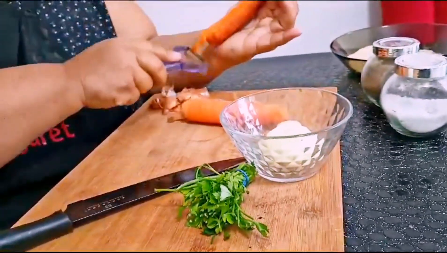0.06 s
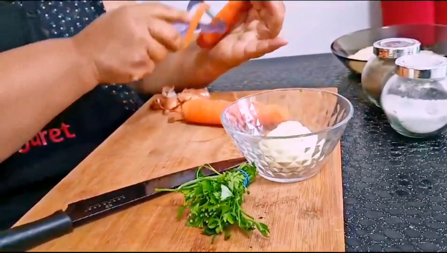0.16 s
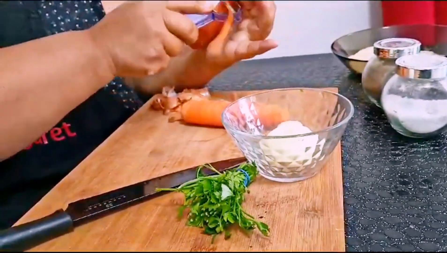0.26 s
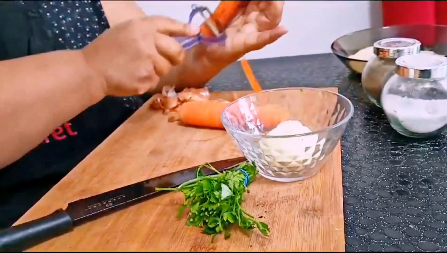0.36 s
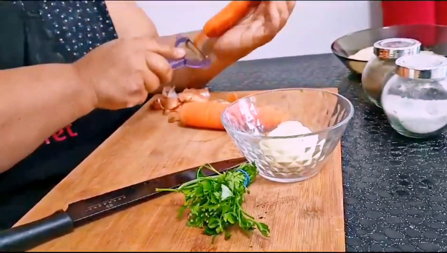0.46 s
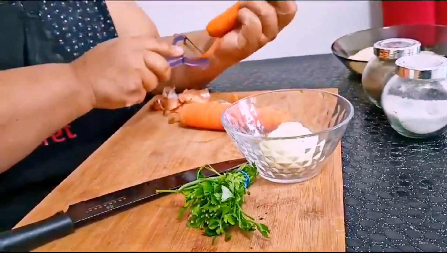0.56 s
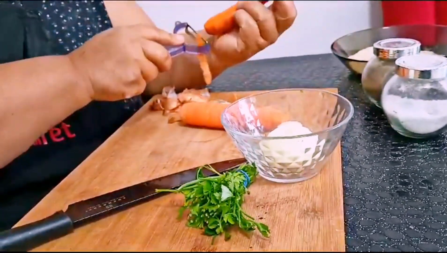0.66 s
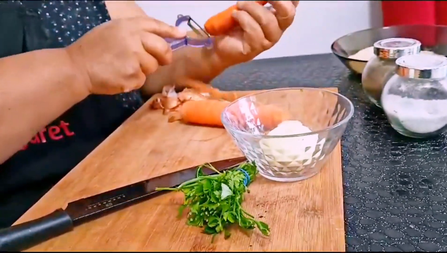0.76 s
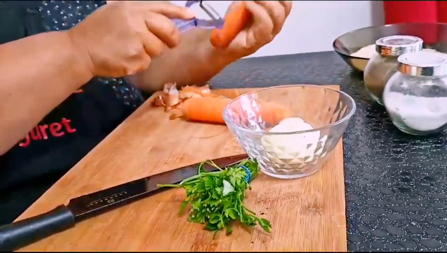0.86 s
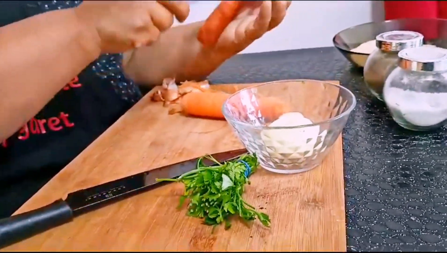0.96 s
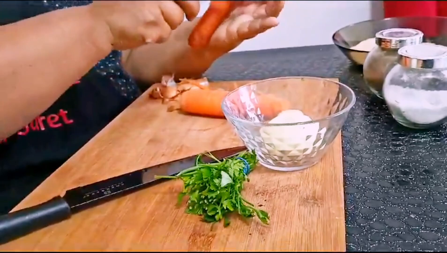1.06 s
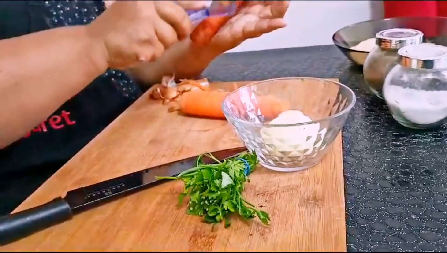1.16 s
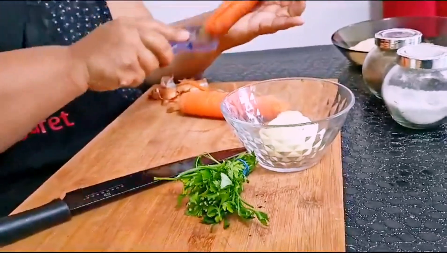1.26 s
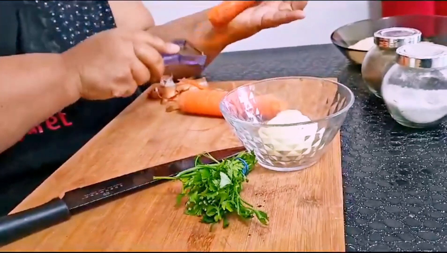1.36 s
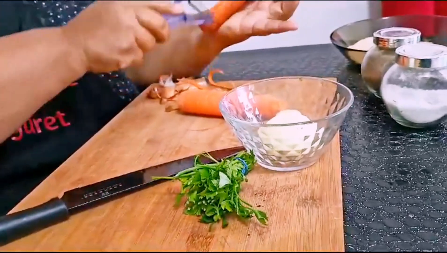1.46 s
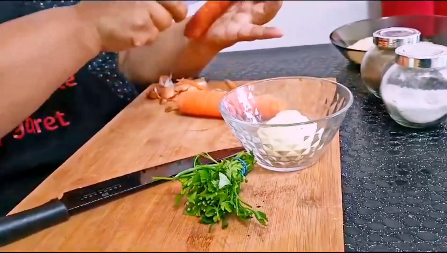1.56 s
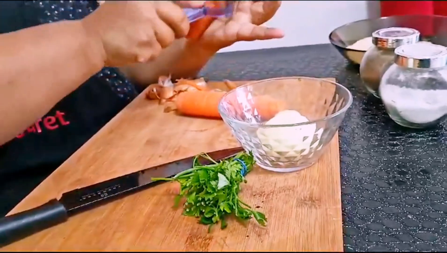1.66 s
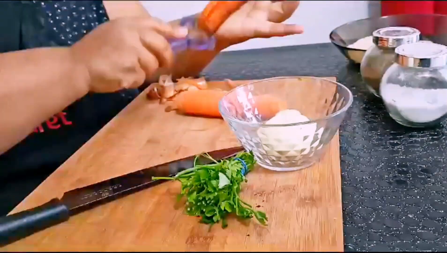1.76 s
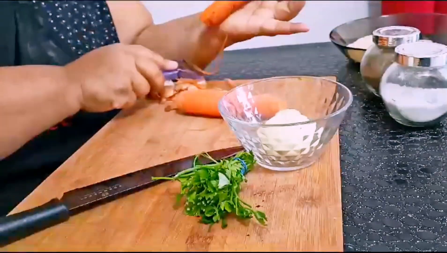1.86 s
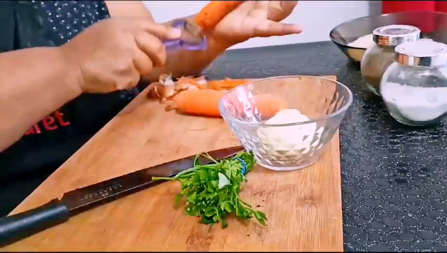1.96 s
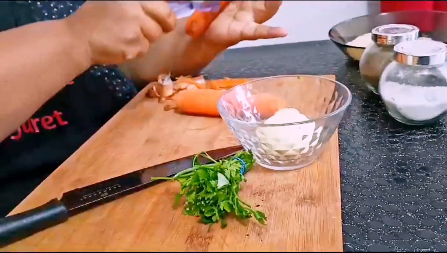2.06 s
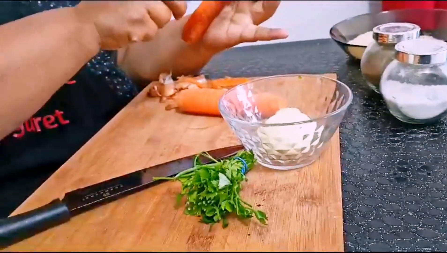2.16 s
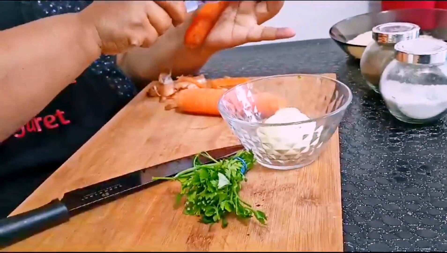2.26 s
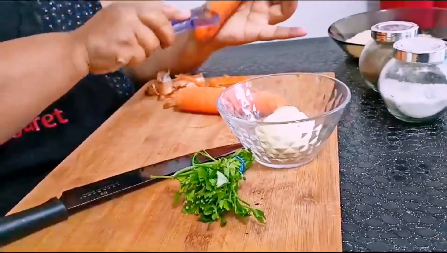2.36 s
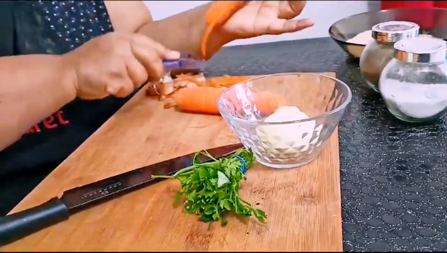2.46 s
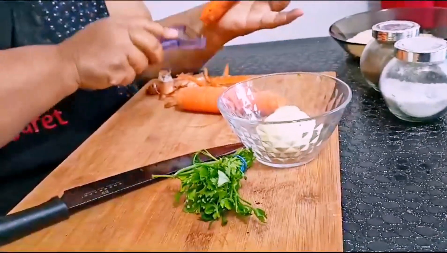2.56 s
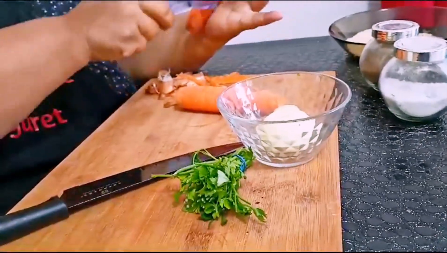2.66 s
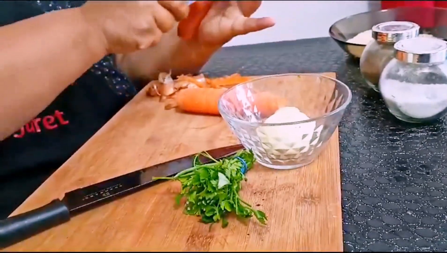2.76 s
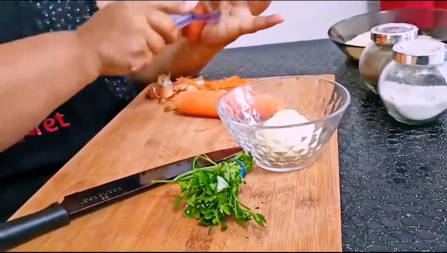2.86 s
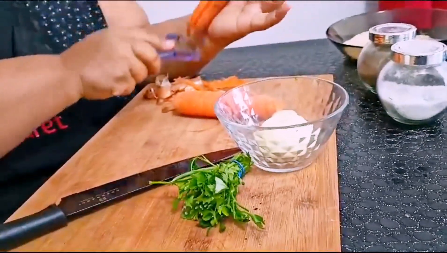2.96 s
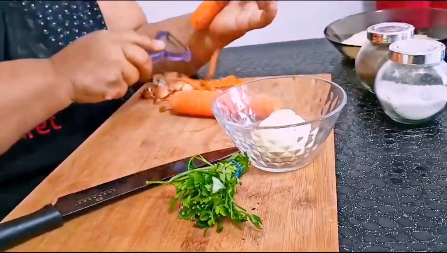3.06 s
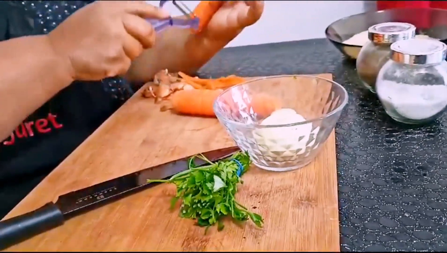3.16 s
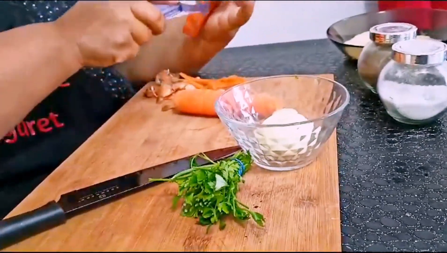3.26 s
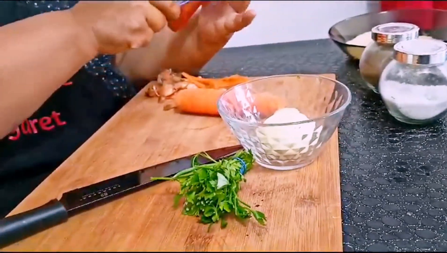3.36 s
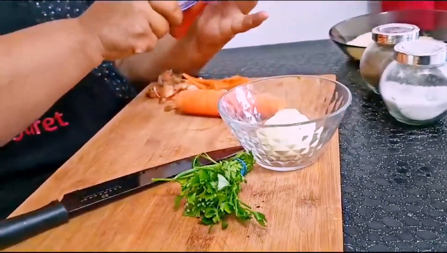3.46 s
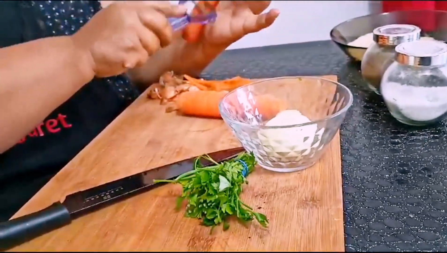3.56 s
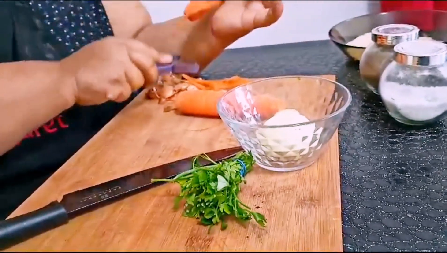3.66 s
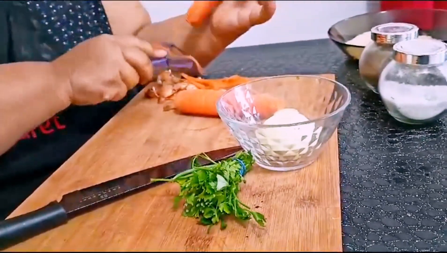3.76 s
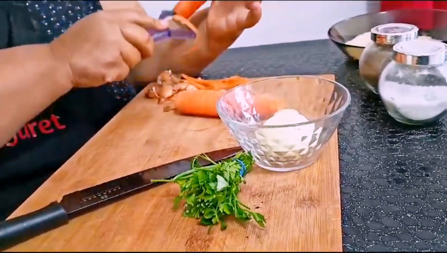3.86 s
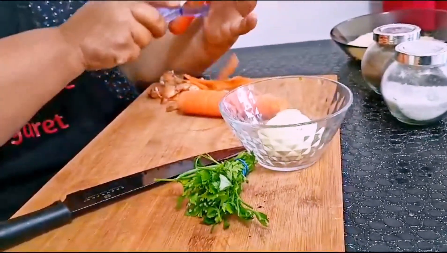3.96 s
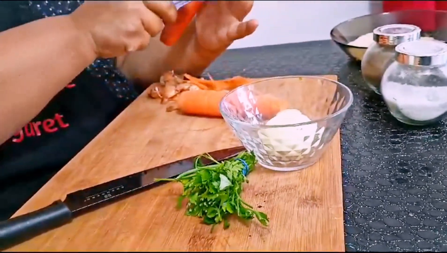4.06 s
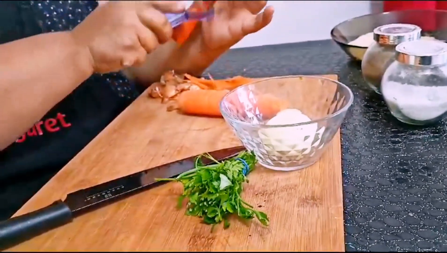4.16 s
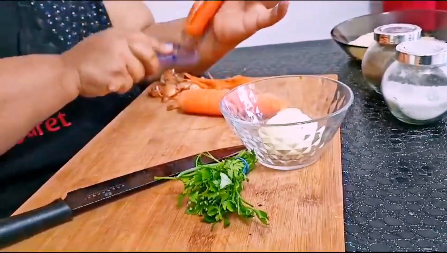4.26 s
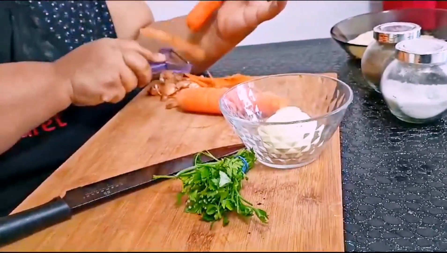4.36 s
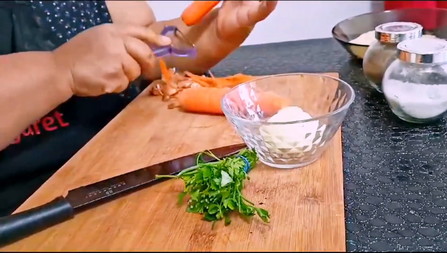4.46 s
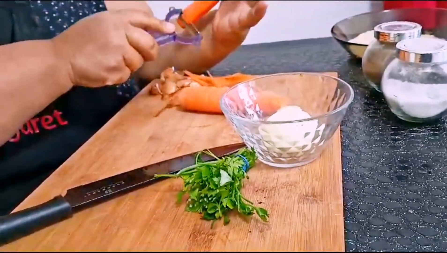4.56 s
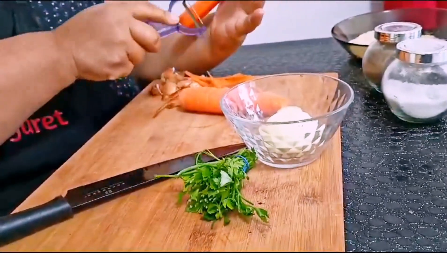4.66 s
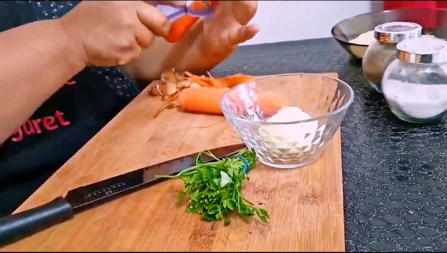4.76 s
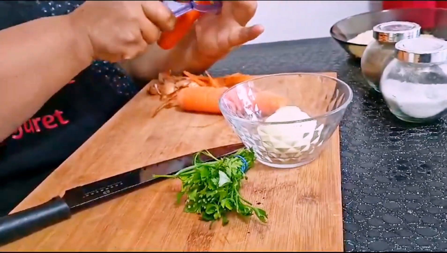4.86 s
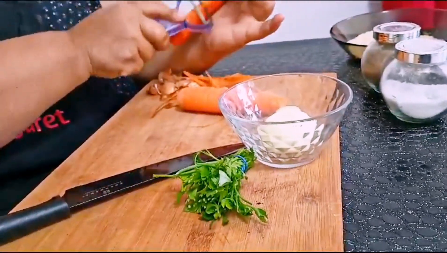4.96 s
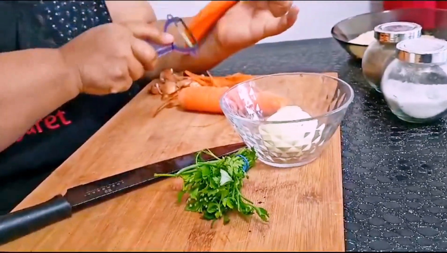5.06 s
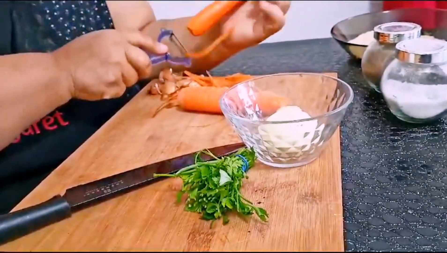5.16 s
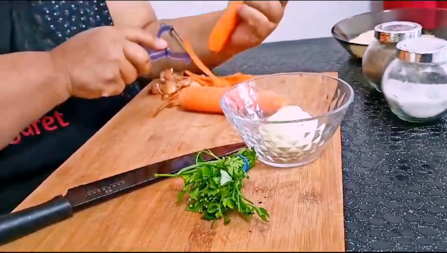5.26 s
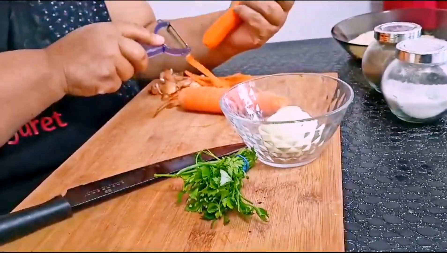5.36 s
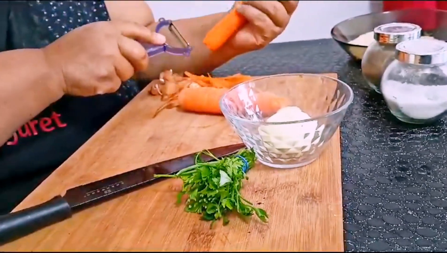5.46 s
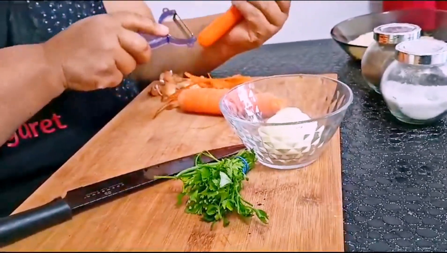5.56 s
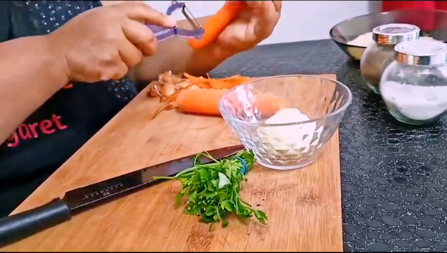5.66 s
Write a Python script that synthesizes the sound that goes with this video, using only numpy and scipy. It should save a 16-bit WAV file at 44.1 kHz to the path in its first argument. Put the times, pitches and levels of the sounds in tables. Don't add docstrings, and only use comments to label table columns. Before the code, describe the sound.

Crisp vegetable peeling, heard close: short gritty scrapes of roughly a fifth to a third of a second, most begun by a tick and all cut off by a hard metallic snap. Blade rattles, knocks and a damp slap of peel come between them. Hard kitchen surfaces give a short bright ring. Low hum and room air rise with the strokes and sink in the pauses, as a phone's noise gate does.

```python
import sys
import numpy as np
from scipy import signal
from scipy.fft import rfft, irfft
from scipy.io import wavfile
from scipy.ndimage import uniform_filter1d

SR = 44100
rng = np.random.default_rng(int(sys.argv[2]) if len(sys.argv) > 2 else 0)


def ratio_of_db(decibels):
    return 10 ** (np.asarray(decibels, float) / 20)


def file_out(sig):
    cols = np.atleast_2d(sig).T
    lim = np.clip(cols, -1, 1)
    pcm = np.round(lim * 32767).astype(np.int16)
    wavfile.write(sys.argv[1], SR, pcm)


N = 251487

# [t/s, peak level/dB, body re peak/dB, blade ring f/Hz, length/ms]
SNAPS = [
    (0.0225, -24.5, 0.5, 7140, 1.63),
    (0.4852, -22.5, 1.5, 7500, 3.9),
    (1.3219, -22.5, 0.5, 7200, 2.8),
    (1.8336, -18.5, -4, 9350, 2.85),
    (2.469, -22.5, -1, 7270, 4.5),
    (3.008, -21, -5.5, 7850, 3.9),
    (3.6969, -17, -7.5, 7700, 3.74),
    (4.3121, -21, -3, 7870, 2.75),
    (5.158, -21.5, -7.5, 7340, 2.8),
]


def evened(x):
    return x / np.sqrt(np.mean(x ** 2) + 1e-20)


def read(points, hz):
    f, value = np.transpose(points)
    return np.interp(np.log(hz + 1), np.log(f + 1), value)


def add(mix, s, sound):
    part = mix[max(round(s * SR), 0):][:len(sound)]
    part += sound[:len(part)]


def wander(seconds):
    size = max(round(seconds * SR), 2)
    return evened(uniform_filter1d(uniform_filter1d(rng.standard_normal(N), size), size))


def resonate(x, hz, width):
    turn = np.exp(2j * np.pi * np.cumsum(hz * np.ones(len(x))) / SR)
    r = np.exp(-np.pi * width / SR)
    return 2 * (turn * signal.lfilter([1 - r], [1, -r], x / turn + 1e-18)).real


def resonate_twice(x, hz, width):
    return resonate(resonate(x, hz, width), hz, width)


def colour(x, points):
    hz = abs(np.fft.fftfreq(4096, 1 / SR))
    log_gain = np.log(ratio_of_db(np.maximum(read(points, hz), -100)))
    response = np.fft.ifft(np.exp(np.conj(signal.hilbert(log_gain)))).real[:2048]
    return signal.oaconvolve(x, response)[:len(x)]


def gate_db():
    # [starts to open t/s, opening length/s, shuts t/s, open hum level/dB, shut hum level/dB]
    openings = [(-0.1, 0.05, 0.078, -53.5, -60), (0.23, 0.12, 0.58, -52.5, -62),
                (0.633, 0.019, 0.685, -58.5, -64.5), (1.067, 0.1, 1.42, -54, -62),
                (1.613, 0.096, 1.928, -54, -62.5), (2.05, 0.032, 2.04, -60, -66.5),
                (2.319, 0.11, 2.54, -52.5, -64.5), (2.75, 0.097, 3.15, -55, -65.5),
                (3.41, 0.07, 3.47, -55, -58), (3.555, 0.054, 3.8, -54.5, -66),
                (4.124, 0.13, 4.4, -52.5, -58), (4.603, 0.054, 4.85, -58.5, -62),
                (4.857, 0.16, 5.25, -52.5, -66)]
    shut_db_per_s, sink_db_per_s, flutter_db = 118, -2.5, 0.97
    opens, rise, shuts, open_db, rest_db = np.transpose(openings)
    after = np.append(opens[1:], N / SR)
    shut = shuts + abs(open_db - rest_db) / shut_db_per_s
    s = np.ravel([opens + rise, shuts, shut, after], "F")
    db = np.ravel([open_db, open_db, rest_db, rest_db + sink_db_per_s * (after - shut)], "F")
    return np.interp(np.arange(N) / SR, np.maximum.accumulate(s), db) + flutter_db * wander(0.027)


def background(open_db):
    # [multiple of the hum/1, level/dB]
    harmonics = [(1, -32), (2, -7), (3, -1.95), (4, -18.5), (5, -23.5), (6, -22)]
    # [f/Hz, level/dB]
    air_spectrum = [(15, -59), (25, -30), (65, -13), (111, -10), (220, -10), (296, -9), (1010, -22.5),
                    (1780, -21), (2270, -26), (2820, -24.5), (5720, -34), (7510, -34.5), (10400, -44),
                    (15200, -32.5), (16500, -29)]
    # [f/Hz, width/Hz, level re air/dB]
    air_peaks = [(2780, 254, -43), (7930, 1100, -14)]
    hum_hz, air_db = 71.64, -5
    fan = (1800, 110, -15.5)  # f/Hz, width/Hz, level re air/dB
    t = np.arange(N) / SR
    hum = np.sqrt(2) * sum(ratio_of_db(db) * np.cos(2 * np.pi * k * hum_hz * t) for k, db in harmonics)
    noise = rng.standard_normal(N)
    air = evened(irfft(rfft(noise) * ratio_of_db(read(air_spectrum, np.fft.rfftfreq(N, 1 / SR))), N))
    for hz, width, db in list(air_peaks) + [fan]:
        air = air + ratio_of_db(db) * evened(resonate(noise[::-1], hz, width))
    return ratio_of_db(uniform_filter1d(open_db, 900)) * (hum + ratio_of_db(air_db) * air)


def tail():
    # [f/Hz, t60/s]
    decay = [(500, 0.42), (2000, 0.43), (5000, 0.34), (8000, 0.34), (12000, 0.18), (16000, 0.33)]
    # [delay t/s, level/dB]
    echoes = [(.0031, -7.5), (.0085, -11), (0.0171, -28)]
    taps = np.zeros(SR // 2)
    at = np.arange(260, SR // 2 - 12, 12)
    taps[at + rng.integers(0, 12, len(at))] = rng.choice([-1., 1.], len(at))
    hz, t, z = signal.stft(taps, SR, nperseg=256)
    out = signal.istft(z * ratio_of_db(-60 * t / read(decay, hz)[:, None]), SR, nperseg=256)[1]
    out = out / np.linalg.norm(out)
    for s, db in echoes:
        add(out, s, ratio_of_db(np.array([db])))
    return out


def kitchen(x):
    turn = 2 * np.pi * 31 * np.arange(N) / SR
    shares = [np.sqrt(2 / 3) * np.cos(turn + k * np.pi / 3) for k in range(3)]
    return sum(signal.fftconvolve(x * share, tail())[:N] for share in shares)


def pats():
    # [t/s, peak level/dB, ring f/Hz]
    landings = [
        (0.687, -61, 573),
        (1.479, -49, 778),
        (3.092, -34, 1430),
        (3.431, -52, 1810),
        (4.389, -50, 1530),
    ]
    out, t = np.zeros(N), np.arange(600) / SR
    for (s, db, hz), noise in zip(landings, rng.standard_normal((len(landings), len(t)))):
        slap = resonate_twice(noise * np.exp(-t / 0.00038), hz, 1100)
        add(out, s, ratio_of_db(db) * slap / abs(slap).max())
    return out


def tearing():
    grains_per_s, spread_db = 9000, 2.5
    size = ratio_of_db(spread_db * np.minimum(rng.exponential(1, N), 5)) * rng.choice([-1., 1.], N)
    clumps = ratio_of_db(1.5 * evened(uniform_filter1d(rng.standard_normal(N), 130)))
    return evened(size * clumps * (rng.random(N) < grains_per_s / SR))


def flexes():
    # [t/s, length/s, level/dB, f/Hz]
    groans = [
        (5.03, 0.098, -59, 814),
        (2.96, .06, -60.5, 870),
    ]
    t, drive, out = np.arange(N) / SR, tearing(), 0
    for s, length, db, hz in groans:
        groan = evened(resonate_twice(drive, hz, 260))
        out = out + ratio_of_db(db) * groan * np.sin(np.pi * np.clip((t - s) / length, 0, 1))
    return out


def knocks():
    # [t/s, peak level/dB, low ring f/Hz, upper ring f/Hz, upper re low/dB]
    blows = [(0.0225, -37.5, 1410, 3070, 8), (0.2698, -27, 2070, 3480, 0), (0.4853, -27.5, 2500, 3120, 2),
             (1.1076, -38.5, 2460, 3230, -8), (1.3229, -32.5, 1760, 2830, -0.5),
             (1.4807, -51, 2570, 2930, -9), (1.6462, -32.5, 2430, 3230, -1.5),
             (1.8332, -27, 1700, 3160, -3), (2.4695, -41, 2680, 3500, -12), (2.7846, -33, 2060, 4520, -6),
             (3.0068, -26.5, 2600, 2845, -14), (3.4326, -45, 1800, 3800, 2.5),
             (3.697, -32, 1830, 2750, 0.5), (4.312, -43, 2500, 2820, -2), (4.8693, -37, 2059, 3130, -9),
             (5.1575, -32.5, 1360, 3230, -2)]
    out, t = np.zeros(N), np.arange(1500) / SR
    for s, db, low_hz, upper_hz, upper_db in blows:
        # f/Hz, level re low ring/dB, t60/s; the last is the blade
        rings = [(low_hz, 0, 0.01), (upper_hz, upper_db, 0.019), (4865, -4, 0.018)]
        sound = sum(ratio_of_db(d - 60 * t / t60) * np.sin(2 * np.pi * hz * t) for hz, d, t60 in rings)
        add(out, s, ratio_of_db(db + 2) * sound * (1 - np.exp(-t / 0.00097)))
    return out


def peeler(x, damp_db=0):
    # [f/Hz, level/dB]
    rasp_spectrum = [(290, -25.5), (500, -9), (700, -14.5), (764, -17), (1220, -9), (1730, -8),
                     (2260, -4.5), (3020, -5.5), (3400, -6.5), (5930, -20.5), (7490, -7), (9600, -13.5),
                     (15100, 4), (15800, 1), (16500, -15.5)]
    # [f/Hz, width/Hz, level/dB]
    blade_modes = [(1760, 130, 1.5), (3080, 170, 4), (5080, 170, 4), (7400, 350, 0.5), (10200, 200, -3)]
    blade = sum(ratio_of_db(db + damp_db) * resonate(x, hz, width) for hz, width, db in blade_modes)
    y = colour(x + blade, rasp_spectrum)
    body = signal.sosfilt(signal.butter(4, 4500, fs=SR, output="sos"), y)
    edge = signal.sosfilt(signal.butter(4, [4500, 11000], "band", fs=SR, output="sos"), y)
    fizz = signal.sosfilt(signal.butter(6, 11000, "high", fs=SR, output="sos"), y)
    return evened(body), evened(edge), evened(fizz)


def rubs():
    # [t/s, peak level/dB, fade/(dB/s), body re level/dB, fizz re level/dB]
    slides = [
        (0.193, -65, -400, 4, -9),
        (0.831, -64.5, -300, -5, -6),
        (0.90, -73.5, -200, -11, 3),
        (1.485, -62.5, -220, -10, -5),
        (3.222, -66, -700, -1, -3),
        (5.522, -73.5, -350, -16, -4),
        (5.645, -80, -250, -13, 8),
    ]
    t, out = np.arange(N) / SR, 0
    body, edge, fizz = peeler(tearing())
    for s, db, fade_db, body_db, fizz_db in slides:
        slope = abs(fade_db)
        level = ratio_of_db(db + np.minimum(12 * slope * (t - s), -slope * (t - s)))
        out = out + level * (ratio_of_db(body_db) * body + edge + ratio_of_db(fizz_db) * fizz)
    return out


def chatter(noise, ms):
    t = np.arange(len(noise)) / SR
    shape = np.minimum(t / 0.000504, 1) * np.exp(-(1000 * t / max(ms, .3)) ** 3)
    z = rfft(noise * shape)
    flat = irfft(z / (abs(z) + 1e-12), len(t)) / (shape + .2)
    return flat * shape


def snaps(table, fizz_db, ring_db=0):
    out = np.zeros(N)
    for (s, db, body_db, hz, ms), noise in zip(table, rng.standard_normal((len(table), 1024))):
        drive = chatter(noise, ms)
        body, edge, fizz = peeler(drive)
        ring = ratio_of_db(ring_db - 3.5) * evened(resonate(drive, hz, 600))
        burst = ratio_of_db(body_db) * body + edge + ratio_of_db(fizz_db) * fizz + ring
        add(out, s, ratio_of_db(db - 4.0) * burst / abs(edge).max())
    return out


def ticks():
    # [t/s, peak level/dB, body re peak/dB, ring f/Hz, length/ms]
    small = [(0.0828, -58, -14, 3060, 1.6), (0.194, -49, -8, 7200, 2.5), (0.61, -44, -19, 1760, 2.1),
             (0.8295, -45, -0.5, 4960, 1.3), (1.481, -42, -2, 2650, 2.2), (1.6007, -67, 16.5, 2930, 1.35),
             (2.26, -62, -1, 7500, 2.5), (3.0165, -36, 2, 7000, 7.8), (3.712, -34, -16, 7400, 2.5),
             (3.7884, -41.5, 3, 3030, 1.9), (3.873, -57, -7, 1780, 1.7), (4.0755, -55, -1, 3800, 3),
             (4.1005, -43.5, 1.5, 4940, 1.9), (4.3898, -46.5, 10, 2800, 1.64), (4.608, -48, 3, 7400, 1.45),
             (4.8069, -62, 10, 4500, 1.6), (5.522, -61, -14, 7110, 1.6)]
    return snaps(small, -15, 5.5)


def touches():
    # [t/s, peak level/dB, body re peak/dB, ring f/Hz, length/ms]
    scuffs = [
        (.2635, -35, -2, 3300, 8.5),
        (1.1035, -29.5, 0, 8200, 6.2),
        (1.6365, -46.5, 8, 2480, 5.4),
        (2.2662, -46, 1.5, 3220, 10),
        (2.7747, -48.5, 8.5, 3330, 7.7),
        (3.095, -33, -10, 4600, 11.4),
        (3.4305, -35, -3.5, 7960, 8.7),
        (4.086, -61, 6, 4500, 13),
        (4.5005, -51, 4, 3700, 15),
        (4.8592, -53, 11.5, 2630, 9.8),
    ]
    return snaps(scuffs, -4)


def bites():
    # [t/s, peak level/dB, body re peak/dB, ring f/Hz, length/ms]
    breaks = [
        (0.2705, -22, -9.5, 7360, 6),
        (1.1077, -25, -13.5, 8600, 5.4),
        (1.6458, -25.5, -5, 6930, 3.4),
        (2.785, -24, -9.5, 7350, 2.2),
        (3.439, -29, -4.5, 7600, 3.2),
        (4.87, -32, -2, 6640, 2.2),
    ]
    return snaps(breaks, -2.5)


def handling():
    # [touch t/s, skid length/s, skid level/dB, cut level/dB, carrot body re pressure/dB]
    passes = [
        (-0.2, 0.05, -55, -47.5, -1),
        (0.26, 0.056, -50.5, -51.5, 0),
        (1.103, 0.056, -47.5, -47, -5),
        (1.636, 0.034, -52, -49, -2),
        (2.263, 0.058, -65.5, -52, -0.5),
        (2.783, 0.049, -50, -49, -2.5),
        (3.436, 0.089, -58, -51.5, 0.5),
        (4.099, 0.042, -67, -52.5, 1),
        (4.864, 0.065, -57, -53, -0.5),
    ]
    dig_s, lift_s = 0.053, .005
    skid_sag, cut_sag = -38, -20.5
    t = np.arange(N) / SR
    now = np.maximum(np.searchsorted(np.transpose(passes)[0], t) - 1, 0)
    touch, skid, skid_db, cut_db, body_db = np.transpose(passes)[:, now]
    dug = np.clip((t - touch - skid) / dig_s, 0, 1)
    cutting = np.clip(t - touch - skid - dig_s, 0, 1)
    skid_level = skid_db + skid_sag * (t - touch)
    level_db = (1 - dug) * skid_level + dug * cut_db + cut_sag * cutting
    touching = t < np.transpose(SNAPS)[0][now] - lift_s
    pressure = ratio_of_db(level_db) * signal.lfilter(np.ones(200) / 200, 1, touching)
    return pressure, body_db, dug, cutting


def uneven(x):
    z = signal.stft(x, nperseg=256)[2]
    patches = evened(uniform_filter1d(uniform_filter1d(rng.standard_normal(z.shape), 5, 0), 14, 1))
    return evened(signal.istft(z * ratio_of_db(3.1 * patches), nperseg=256)[1][:N])


def strokes():
    pressure, body_db, dug, cutting = handling()
    body_db = body_db + 37.5 * cutting
    skid_fizz_db, cut_fizz_db = -6.5, 2
    fizz_db = skid_fizz_db + (cut_fizz_db - skid_fizz_db) * dug + 9 * cutting
    carrot_hz = (2650 + (3020 - 2650) * dug) * (1 + .035 * wander(.05))
    strip_hz = (4400 + (4050 - 4400) * dug) * (1 + .035 * wander(.05))
    whistle_hz = 13520 * (1 + .025 * wander(.05))
    body, edge, fizz = peeler(uneven(tearing()), -3)
    drive = tearing()
    body = body + ratio_of_db(-4.5) * evened(resonate_twice(drive, carrot_hz, 420))
    body = body + ratio_of_db(-14.5) * evened(resonate_twice(drive, strip_hz, 290))
    whistle = evened(resonate_twice(drive, whistle_hz, 380))
    fizz = evened(fizz + ratio_of_db(-7) * whistle)
    return pressure * (ratio_of_db(body_db) * evened(body) + edge + ratio_of_db(fizz_db) * fizz)


def scene():
    gate = gate_db()
    rasp = strokes() + rubs() + flexes()
    hits = bites() + snaps(SNAPS, -0.5) + ticks() + touches() + knocks() + pats()
    wet = kitchen(ratio_of_db(-1) * rasp + ratio_of_db(-3.5) * hits)
    gate_share, gate_open_db = 0.7, -55
    wet = wet * ratio_of_db(gate_share * uniform_filter1d(gate - gate_open_db, 2000))
    return (rasp + hits + wet + background(gate))[None]


def low_pass(x):
    return signal.sosfilt(signal.butter(12, 16830, fs=SR, output="sos"), x)


def record(dry):
    cut = signal.sosfilt(signal.butter(2, 38, "high", fs=SR, output="sos"), dry)
    taps = signal.firwin(701, 15800, window=("kaiser", 6), fs=SR)
    low = signal.oaconvolve(cut, taps[None], "same")
    power = uniform_filter1d(cut ** 2, 300, axis=1)
    spill = np.clip(power / ratio_of_db(2 * -33.) - 1, 0, 1)
    return low_pass(low + ratio_of_db(-11) * spill * (cut - low))


dry = scene()
out = record(dry)
file_out(out)
```